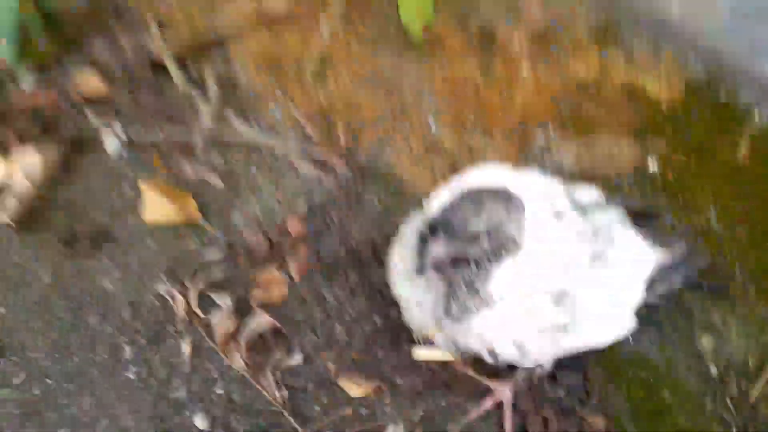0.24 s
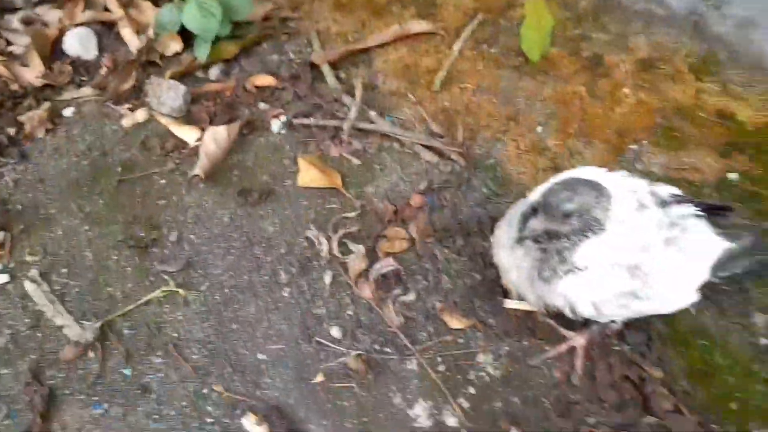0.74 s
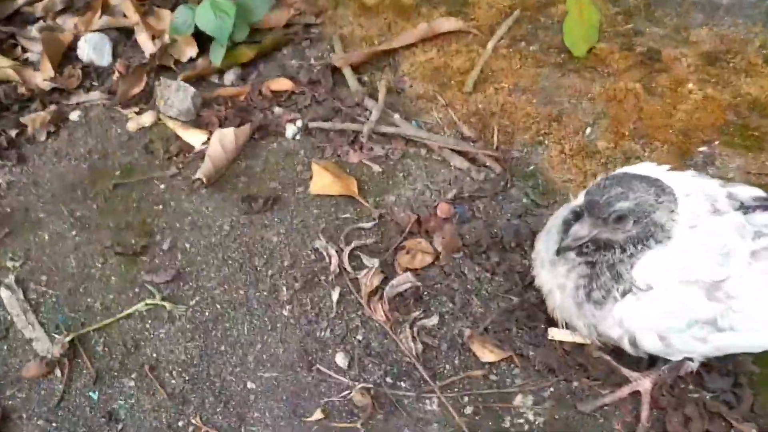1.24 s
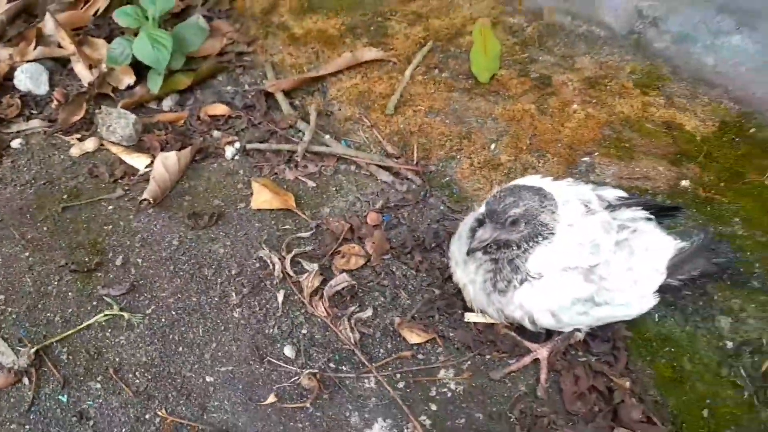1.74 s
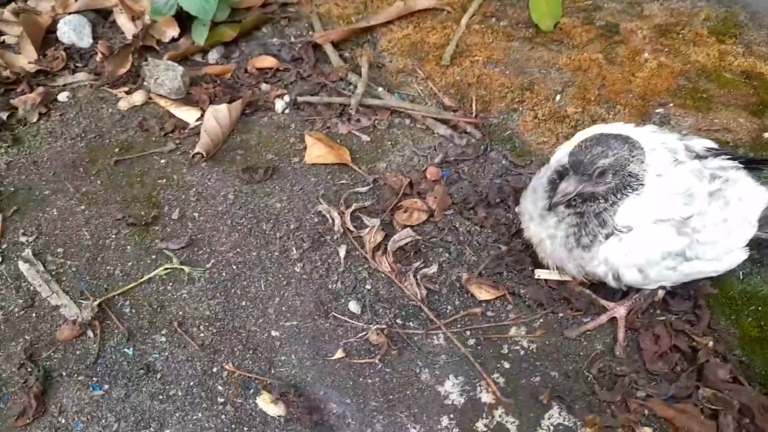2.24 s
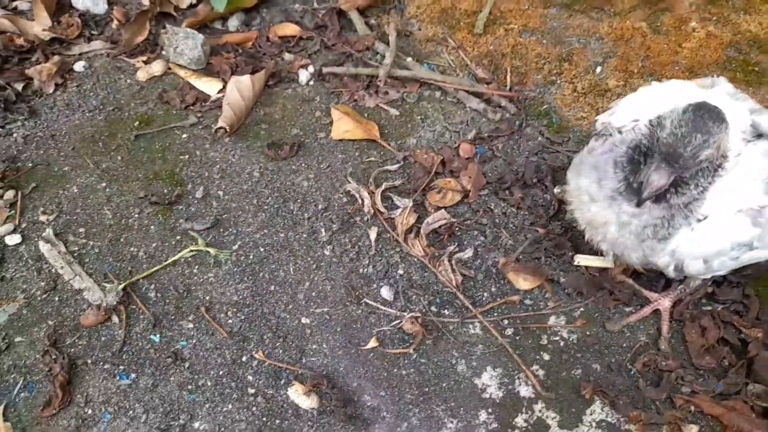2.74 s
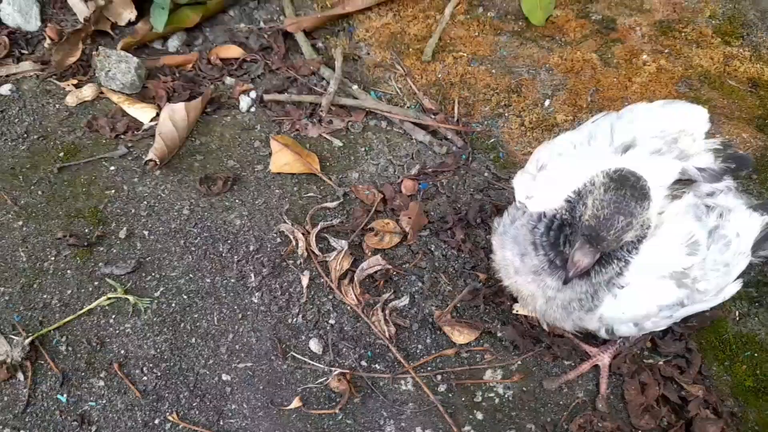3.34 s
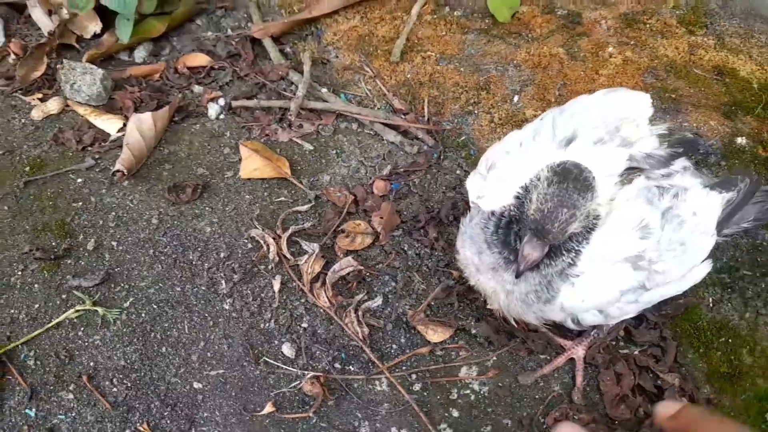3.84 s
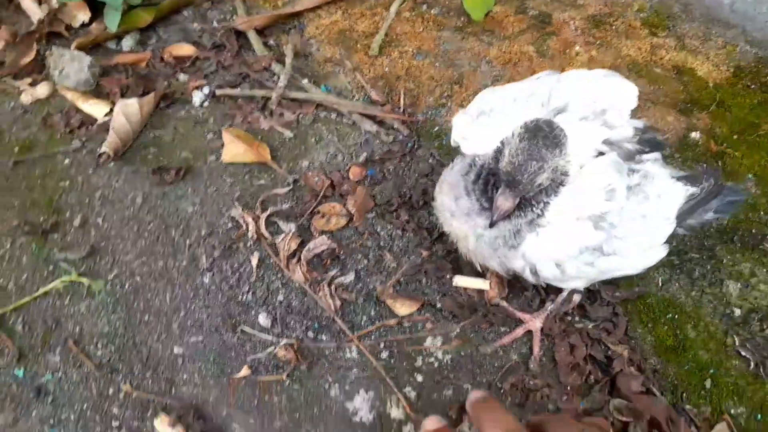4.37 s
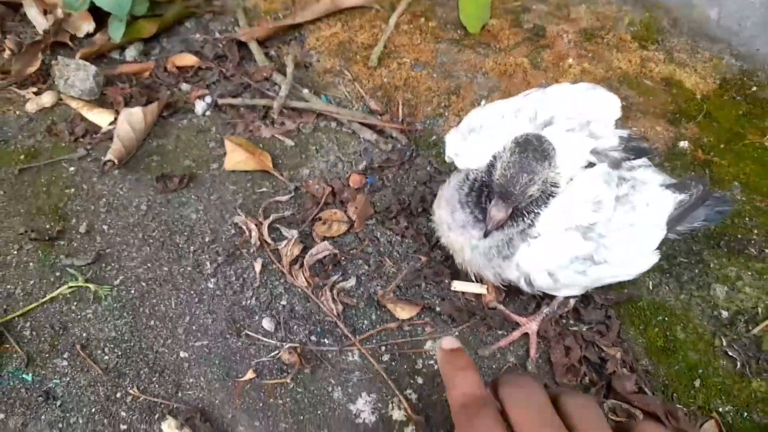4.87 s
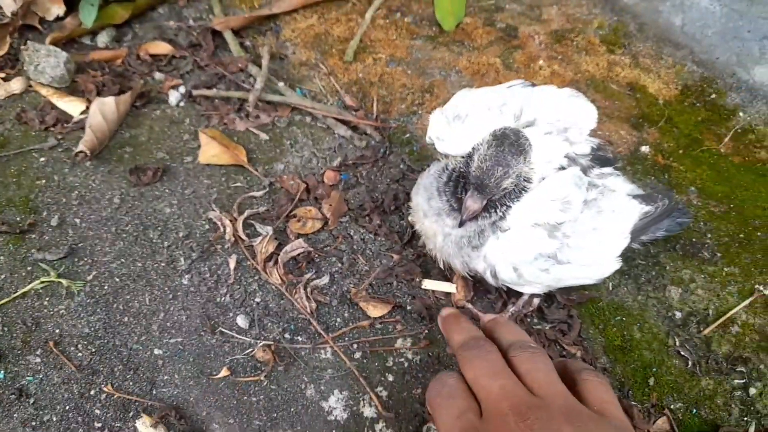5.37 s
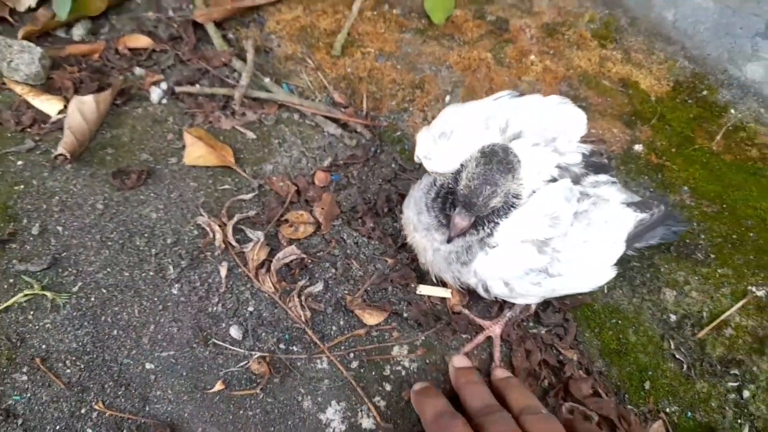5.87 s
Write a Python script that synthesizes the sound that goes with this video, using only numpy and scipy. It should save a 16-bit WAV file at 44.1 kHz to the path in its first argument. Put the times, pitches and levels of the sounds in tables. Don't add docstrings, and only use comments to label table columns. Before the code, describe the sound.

A faint fading echo and light scuffing open the scene. Close by, a young pigeon gives three piercing, wavering peeps, the first swelling from faint, then two lone peeps, then a final run of three. Short gritty rustles of feet and dry leaves fall between them. A steady distant machine hum and slight hiss lie underneath. Outdoor yard, hard walls answering softly, handheld stereo microphone close above the bird.

```python
import sys
import numpy as np
from scipy import signal
from scipy.fft import rfft, irfft, next_fast_len
from scipy.io import wavfile
from scipy.ndimage import uniform_filter1d, map_coordinates

SR = 44100
rng = np.random.default_rng(int(sys.argv[2]) if len(sys.argv) > 2 else 0)


def dump(signal):
    limited = np.clip(np.atleast_2d(signal).T, -1, 1)
    pcm = np.round(limited * 32767).astype(np.int16)
    wavfile.write(sys.argv[1], SR, pcm)


def linear_from_db(decibels):
    return 10 ** (np.asarray(decibels, float) / 20)


N = 269451
TIME = np.arange(N) / SR

# pitch_hz, level_db (per Hz)
HUM_COLOUR = [(15, -56), (25, -20), (43, -10.5), (102, -13), (188, -10.5), (228, -13), (363, -8.5),
              (412, -11), (499, -1.5), (604, -12.5), (964, -17.5), (1100, -17.5), (1380, -28.5),
              (1900, -23.5), (4000, -47.5), (5200, -95.5), (8800, -120)]
# pitch_hz, likeness (0 to 1)
HUM_LIKENESS = [(30, 1), (60, 0.79), (130, 0.95), (290, 0.99), (640, 1), (1410, 0.11), (3000, 0.15)]
# pitch_hz, level_db
HUM_BALANCE = [(60, 0.5), (200, 0.5), (500, -0.5), (1290, -6.5), (2380, -6.5), (4400, -6)]
# pitch_hz, lead_radians
HUM_LEFT_LEAD = [(100, 0.28), (690, -1.2), (1300, -1.2)]
# pitch_hz, level_db
MAINS_TONE = [(100, -61.5)]
# start_s, level_db, rise_s, t60_s (time to fall 60 dB), dull_db (weight of the drag)
GROUND_SCUFFS = [(.0, -64, 0.011, 0.29, -7), (0.071, -61.5, 0.015, .4, -1),
                 (0.958, -56.5, 0.034, 0.36, -1.5), (1.16, -62.5, 0.014, 0.33, -16),
                 (1.519, -69.5, 0.023, .6, -27), (1.768, -60.5, 0.037, 0.3, -3.5),
                 (1.953, -65.5, .001, .04, -15), (2.079, -72.5, 0.0036, .16, 20.5),
                 (2.088, -54.5, 0.015, 0.31, -6.5), (2.459, -72, 0.00095, 0.026, -15),
                 (2.548, -70.5, 0.0011, 0.052, 3), (2.58, -69.5, 0.008, 0.21, 4.5),
                 (3.0, -71, 0.022, .35, -10), (3.118, -57.5, 0.0082, .25, -33),
                 (3.49, -76.5, 0.013, 0.25, -13.5), (4.054, -48, 0.011, .18, -14),
                 (4.458, -65.5, 0.0039, .3, -4), (4.839, -60.5, 0.0093, 0.28, -22),
                 (4.9, -57, 0.0033, 0.28, -7.5), (5.013, -72.5, 0.0076, .3, -6.5),
                 (5.418, -57.5, 0.014, 0.23, -31), (5.82, -68, 0.047, 0.444, -11)]
# pitch_hz, level_db (per Hz)
GRIT_COLOUR = [(700, -42.5), (2000, -5.5), (4450, -1), (9000, -12), (12500, -10.5), (15700, -24)]
# pitch_hz, level_db (per Hz)
DULL_COLOUR = [(300, -5), (800, -14.5), (1150, -0.5), (1900, -7), (3000, -16.5), (5000, -48.5)]
# time_s, pitch_hz, level_db
FIRST_PEEPS = [
    [(.285, 3800, -43.5), (.315, 4004, -37.5), (.37, 4002, -33), (.392, 4582, -27.5), (.415, 4407, -31.5),
     (.435, 4293, -41), (.455, 4380, -33), (.497, 4448, -21)],
    [(.75, 3650, -38), (.768, 3976, -34.5), (.792, 3560, -31), (.818, 4048, -29), (.855, 4380, -21),
     (.88, 4955, -18.5), (.905, 4640, -27), (.92, 4510, -14), (.958, 4430, -19)],
    [(1.235, 4620, -19), (1.251, 4680, -31), (1.267, 4816, -24.5), (1.297, 4380, -18.5),
     (1.347, 4540, -20.5), (1.37, 4750, -18), (1.392, 4290, -26), (1.403, 4230, -14.5), (1.42, 4230, -17.5)],
]
# time_s, pitch_hz, level_db
SINGLE_PEEPS = [
    [(1.974, 3873, -39), (2.012, 3960, -30), (2.033, 4200, -20), (2.064, 4092, -21), (2.093, 4697, -17),
     (2.117, 3933, -23), (2.126, 4016, -25.5)],
    [(2.581, 3894, -35.5), (2.622, 3720, -26), (2.672, 3815, -27), (2.698, 4310, -20.5),
     (2.717, 3924, -25.5), (2.735, 4180, -24), (2.75, 4130, -24), (2.765, 4300, -24), (2.793, 4231, -22)],
]
# time_s, pitch_hz, level_db
FINAL_PEEPS = [
    [(3.854, 3700, -36), (3.892, 4548, -20.5), (3.922, 4098, -20), (3.94, 4508, -17), (3.965, 4646, -17.5),
     (3.994, 4504, -14), (4.02, 4897, -30), (4.042, 4604, -29.5), (4.058, 4990, -15)],
    [(4.252, 4027, -33), (4.263, 4360, -22.5), (4.278, 4067, -28), (4.305, 4137, -20.5),
     (4.336, 4283, -17.5), (4.36, 4364, -18), (4.378, 4760, -18.5), (4.395, 4527, -17.5),
     (4.444, 4626, -17.5)],
    [(5.195, 3605, -37.5), (5.226, 3838, -21.5), (5.245, 3725, -21.5), (5.285, 3832, -21),
     (5.32, 4600, -28), (5.337, 4990, -37), (5.368, 4864, -29.5), (5.4, 4880, -32.5), (5.423, 4740, -24.5)],
]
# start_s, length_s, gap_hz, level_db
SPLITS = [
    (.275, .08, 400, -46),
    (.862, .052, -220, -23),
    (.946, .04, -330, -28),
    (1.246, .016, 680, -35),
    (1.428, .024, -400, -41),
    (4.0, .038, 310, -22),
    (4.048, .028, 250, -26),
    (4.25, .024, -350, -34),
    (4.278, .026, 300, -33),
    (5.413, .038, -380, -29),
]
# time_s, pitch_hz, level_db
OWN_WAY = [
    [(1.265, 4230, -35), (1.275, 4250, -30), (1.3, 4190, -27), (1.322, 4280, -25), (1.34, 4120, -25),
     (1.368, 4450, -24), (1.392, 4020, -24), (1.402, 4120, -35)],
    [(5.303, 3950, -38), (5.32, 3860, -28), (5.336, 4020, -33), (5.344, 4150, -36), (5.356, 4010, -32),
     (5.368, 4020, -30), (5.376, 4450, -31), (5.408, 4620, -36)],
]
# overtone_db, third_partial_db, haze_db, rasp_db
PEEP_TONE = [
    (-23.5, -3.5, -28, -39),
    (-19.5, 6, -34, -39.5),
    (-25.5, -5, -36, -55),
    (-20, -5.5, -28.5, -39.5),
    (-28, -1.5, -32.5, -56),
    (-23.5, -0.5, -34, -52),
    (-22.5, -8, -34, -50.5),
    (-19, -5.5, -36, -46),
]
# left_over_right_db, left_lead_radians, right_notch_hz
MIC_POSE = [
    (0.5, .1, 4020),
    (6, 0.4, 4200),
    (5, 0.89, 4230),
    (3.5, .3, 4100),
    (2, .2, 4270),
    (4.5, .3, 4260),
    (3, .2, 4320),
    (1.5, 0.92, 4330),
]
# pitch_hz, level_db
OVERTONE_COLOUR = [(6500, 3.5), (7900, 2.5), (8650, -2.5), (9500, 3), (10500, -1)]
# pitch_hz, level_db
THIRD_PARTIAL = [(9000, -51), (11500, -29.5), (13500, -25.5), (15500, -26.5)]
# pitch_hz, level_db
THROAT_COLOUR = [(3000, -12.5), (3800, -5), (4600, -4), (5200, -3.5), (5900, -27)]
# pitch_hz, level_db (per Hz)
RASP_COLOUR = [(2500, -25.5), (5500, 7), (9000, 2), (11000, -11), (14000, -17), (15700, -9.5)]
# pitch_hz, level_db
RIGHT_SHADOW = [(6000, -4), (8000, -11), (10000, -26.5), (13500, -14)]
# pitch_hz, t60_s
YARD_FADE = [(2000, .3), (4500, .3), (12000, .18)]
# pitch_hz, level_db (per Hz)
HISS_COLOUR = [(1500, -28.5), (3500, -3), (8000, -7.5), (13000, -5.5), (15700, -6)]
# pitch_hz, level_db
FAINT_LIMIT = [(2800, -66.5), (3300, -41.5), (5600, -42), (7000, -70.5), (9000, -50), (11000, -59.5),
               (15000, -59)]


def unit(x):
    return x / np.sqrt(np.mean(np.abs(x) ** 2) + 1e-20)


def along(points, hz):
    f, v = np.transpose(points)
    return np.interp(np.log(np.abs(hz) + 1), np.log(f + 1), v)


def wobble(rate):
    return map_coordinates(rng.standard_normal(int(N * rate / SR) + 4), [TIME * rate])


def filtered(x, response):
    m = next_fast_len(N + SR // 2)
    return irfft(rfft(x, m) * response(np.fft.rfftfreq(m, 1 / SR)), m)[..., :N]


def rush(spectrum, alike, patchy_db):
    z = signal.stft(rng.standard_normal((2, N + 512)), nperseg=512)[2]
    field = uniform_filter1d(rng.standard_normal(z.shape[1:]), 6, 0)
    field = uniform_filter1d(field, 10, 1)
    pair = signal.istft(z * linear_from_db(patchy_db * unit(field)), nperseg=512)[1][:, :N]

    def mid_side(hz):
        turn = np.arccos(np.clip(along(alike, hz), -1, 1)) / 2
        return linear_from_db(along(spectrum, hz)) * [np.cos(turn), np.sin(turn)]

    mid, side = filtered(pair, mid_side)
    return unit(np.array([mid + side, mid - side]))


def hum():
    ports = np.array([[.5], [-.5]])

    def to_ports(hz):
        return linear_from_db(ports * along(HUM_BALANCE, hz)) * np.exp(1j * ports * along(HUM_LEFT_LEAD, hz))

    level_db = -47 + .5 * wobble(2.9)
    roar = linear_from_db(level_db) * filtered(rush(HUM_COLOUR, HUM_LIKENESS, patchy_db=1.3), to_ports)
    tone = 0
    for hz, db in MAINS_TONE:
        strength = linear_from_db(db + 2.5 + 2 * wobble(31))
        tone = tone + strength * np.sin(2 * np.pi * np.cumsum(hz + 2.5 * wobble(16)) / SR)
    return roar + tone


def earlier_peep():
    echo = rush([(3400, -26), (4250, 2.0), (4500, 1.0), (4900, -27)], [(4000, 0.35)], patchy_db=5.0)
    return linear_from_db(-48 - 60 * TIME / .3) * echo


def scuffs():
    grit_power, dull_power = np.zeros(N), np.zeros(N)
    for s, db, rise, t60, dull_db in GROUND_SCUFFS:
        t = np.maximum(TIME - s, 0)
        swell = linear_from_db(db - 60 * t / t60) * (1 - np.exp(-t / rise)) ** 2
        grit_power += swell ** 2
        dull_power += (swell * linear_from_db(dull_db)) ** 2
    crunch = linear_from_db(15.5 + 2.7 * wobble(250))
    alike = [(1000, 0.13)]
    grit = np.sqrt(grit_power) * rush(GRIT_COLOUR, alike, patchy_db=0.0)
    dull = np.sqrt(dull_power) * rush(DULL_COLOUR, alike, patchy_db=0.5)
    return crunch * (grit + dull)


def shaped(note):
    from_hz, scoop_hz_per_s, attack_db = 3100, 60000, 27
    release_s, rest_hz, release_db = .029, 3336, 19.5
    (s, hz, db), (end, end_hz, end_db) = note[0], note[-1]
    rise = hz - from_hz
    scoop = [(s - u * rise / scoop_hz_per_s, hz - u * rise, db - attack_db * share)
             for u, share in [(0.92, 0.96), (.5, .33)]]
    fall = [(end + release_s * u, end_hz + (rest_hz - end_hz) * share, end_db - release_db * share)
            for u, share in [(.5, .4), (1, 0.96)]]
    return [*scoop, *note, *fall]


def glides(notes, round_s):
    s, *cols = np.transpose(np.concatenate(notes))
    size = max(round(round_s * SR), 1)
    gate = sum((TIME > note[0][0]) & (TIME < note[-1][0]) for note in notes) > 0
    curves = []
    for col in cols:
        once = uniform_filter1d(np.interp(TIME, s, col), size)
        curves.append(uniform_filter1d(once, size))
    return curves, uniform_filter1d(gate * 1., size)


def other_side(hz):
    part, close_gap, edge_db = 0.26, .25, 16.5
    arch = [(0, close_gap, edge_db), (part, 1, 0), (1 - part, 1, 0), (1, 1, edge_db)]
    splits = [[(s + length * u, 1, gap * wide, db - fade) for u, wide, fade in arch]
              for s, length, gap, db in SPLITS]
    held = [[(s, 0, own, db) for s, own, db in note] for note in OWN_WAY]
    (follow, own_hz, db), gate = glides(sorted(splits + held), round_s=.004)
    return follow * hz + own_hz, db, gate


def membrane(hz, db, gate, flutter_hz, tremor_db):
    phase = 2 * np.pi * np.cumsum(hz + flutter_hz * wobble(250)) / SR
    return np.sqrt(2) * gate * linear_from_db(db + tremor_db * wobble(120)) * np.exp(1j * phase)


def timbre(hz, db, split, which, start, end):
    over_db, third_db, haze_db, rasp_db = np.transpose(PEEP_TONE)[:, which]
    effort = db + 23
    high = np.maximum(hz - 4300, 0) / 1e3
    fresh = np.exp(-np.abs(TIME - start[which]) / 0.035)
    strain = np.exp(-np.abs(end[which] - TIME) / .02)
    over_db = over_db - 0.58 * effort + 3 * strain + along(OVERTONE_COLOUR, 2 * hz) + 2.5 * wobble(45)
    third_db = third_db - 0.34 * effort - 1.5 * split - 7 * strain + 2.5 * wobble(45)
    haze_db = haze_db - 0.33 * effort + 10 * fresh + 7.5 * split + 6.5 * high
    rasp_db = rasp_db - 0.014 * effort + 7 * fresh + 7.5 * strain + 4.5 * split + 8.5 * high
    return over_db, third_db, haze_db, rasp_db


def windpipe(pipe, hz, db, over_db, third_db, haze_db, rasp_db):
    size = np.sqrt(np.abs(uniform_filter1d(np.abs(pipe) ** 2, size=400))) + 1e-6
    bouts_db = 2.5 * wobble(60)

    def haze(width_hz):
        return linear_from_db(haze_db + bouts_db) * (wobble(width_hz) + 1j * wobble(width_hz))

    def throat(x):
        return filtered(x, lambda f: linear_from_db(along(THROAT_COLOUR, f)))

    beat = np.abs(pipe) ** 2 / size ** 2 - 1
    pull = .19 + .8 * linear_from_db(-(db + 38) ** 2 / 6) * (TIME < .4)
    around = pipe * (pull * beat + haze(2200))
    whistle = pipe + throat(around.real) + 1j * throat(around.imag)
    second = linear_from_db(over_db) * pipe ** 2 / size * (1 + linear_from_db(6) * haze(2500))
    third = linear_from_db(along(THIRD_PARTIAL, 3 * hz) + third_db) * pipe ** 3 / size ** 2
    third = third * (1 + linear_from_db(14.5) * haze(2700))
    fourth = linear_from_db(third_db - 38) * (4 * hz < 16000) * pipe ** 4 / size ** 3
    rasp_level = linear_from_db(rasp_db + 2.5 * wobble(90)) * size
    rasp = rasp_level * rush(RASP_COLOUR, [(5000, 0.094)], patchy_db=6.0)
    return whistle, np.real(second + third + fourth) + rasp


def at_ports(whistle, over, which):
    pan_db, lead, notch_hz = np.transpose(MIC_POSE)[:, which]
    port_lag_s = 10 / SR

    def late(f):
        return np.exp(-2j * np.pi * f * port_lag_s)

    left = linear_from_db(pan_db / 2) * (np.real(whistle) + over[0])
    right = filtered(np.real(linear_from_db(-pan_db / 2) * np.exp(-1j * lead) * whistle), late)
    mirror_s = 4.5 / notch_hz
    right = right + .4 * map_coordinates(right, [(TIME - mirror_s) * SR])
    shaded = filtered(over[1], lambda f: linear_from_db(along(RIGHT_SHADOW, f)) * late(f))
    return np.array([left, right + linear_from_db(pan_db / 2) * shaded])


def chick():
    notes = [shaped(note) for note in FIRST_PEEPS + SINGLE_PEEPS + FINAL_PEEPS]
    (hz, db), gate = glides(notes, round_s=.0045)
    split_hz, split_db, split_gate = other_side(hz)
    start, end = np.transpose([(note[0][0], note[-1][0]) for note in notes])
    which = np.searchsorted((start[1:] + end[:-1]) / 2, TIME)
    tone = timbre(hz, db, split_gate, which, start, end)
    pipe = membrane(hz, db, gate, flutter_hz=20, tremor_db=.3)
    pipe = pipe + membrane(split_hz, split_db, split_gate, flutter_hz=30, tremor_db=.8)
    whistle, over = windpipe(pipe, hz, db, *tone)
    return at_ports(whistle, over, which)


def yard(x):
    hz, t, z = signal.stft(rng.standard_normal((2, SR // 2)), SR, nperseg=256)
    fade = linear_from_db(-60 * t / along(YARD_FADE, hz)[:, None])
    tail = signal.istft(z * fade, SR, nperseg=256)[1]
    tail = tail / np.linalg.norm(tail[0])
    delayed = np.pad(x, (250, 0))[None]
    return signal.fftconvolve(delayed, tail, axes=1)[:, :N]


def masked(x, band_hz, from_hz):
    hz, _, z = signal.stft(x, SR, nperseg=2048)
    band = (hz // band_hz).astype(int)
    power = np.array([np.mean(np.abs(z[:, band == b]) ** 2, axis=(0, 1)) for b in range(band[-1] + 1)])
    under_db = along(FAINT_LIMIT, band_hz * np.arange(len(power)))[:, None]
    under_db = under_db + 2 * rng.standard_normal(power.shape)
    heard = power > power.max(axis=0) * linear_from_db(under_db) ** 2
    keep = heard[band] | (hz < from_hz)[:, None]
    return signal.istft(z * keep * (hz < 15710)[:, None], SR, nperseg=2048)[1][:, :N]


def scene():
    background = hum() + earlier_peep() + scuffs()
    bird = chick()
    echo = linear_from_db(-25.5) * yard(bird.mean(axis=0))
    return background + bird + echo


def roll_off(x):
    return signal.sosfilt(signal.butter(12, 15710, fs=SR, output="sos"), x)


def record(dry):
    hiss = linear_from_db(-69) * rush(HISS_COLOUR, [(1000, .03)], patchy_db=.4)
    mix = masked(dry + hiss, band_hz=520, from_hz=2600)
    return roll_off(mix)


dry = scene()
out = record(dry)
dump(out)
```